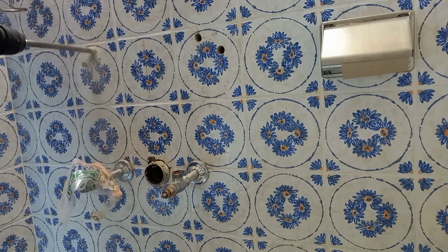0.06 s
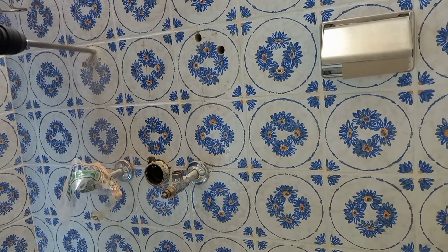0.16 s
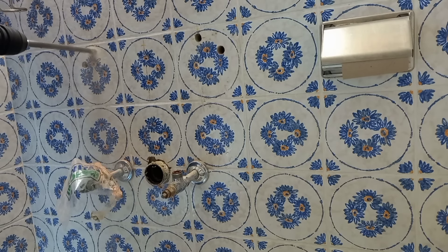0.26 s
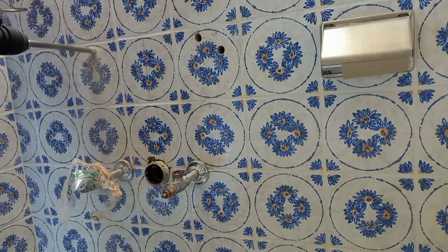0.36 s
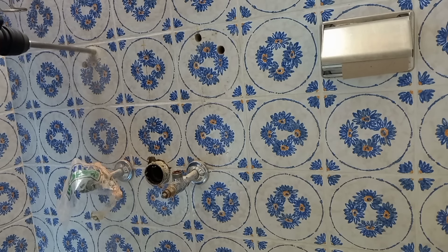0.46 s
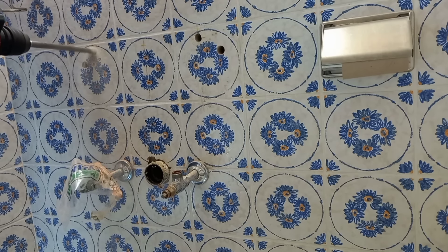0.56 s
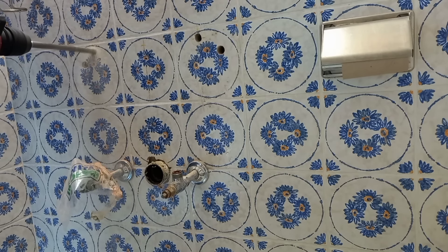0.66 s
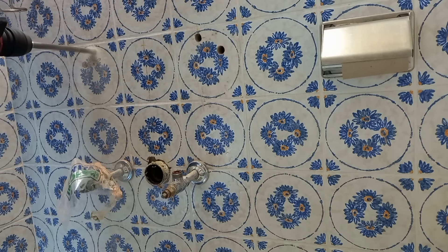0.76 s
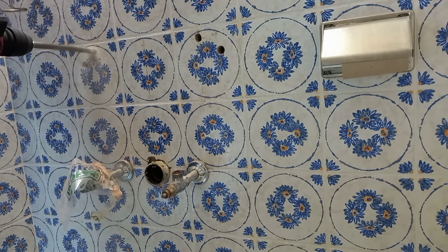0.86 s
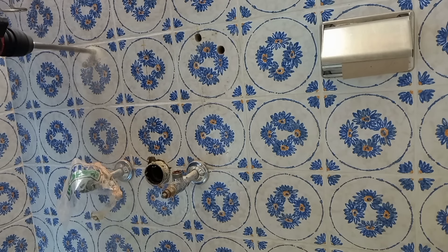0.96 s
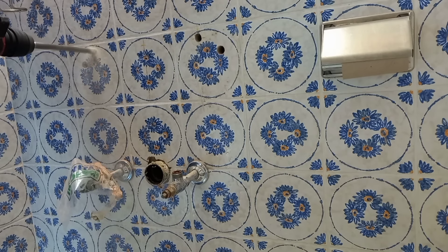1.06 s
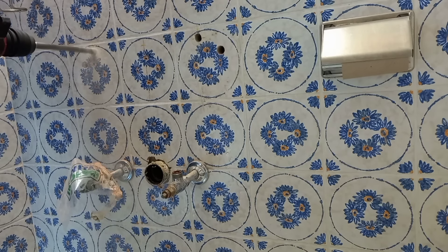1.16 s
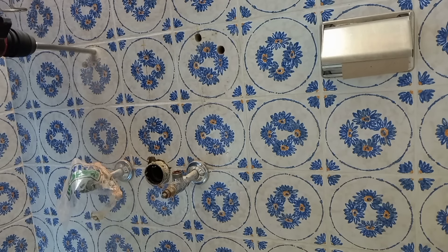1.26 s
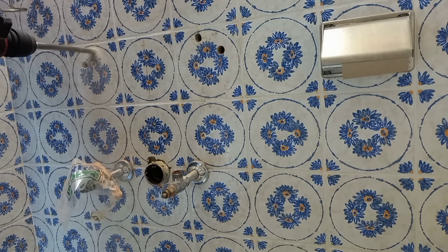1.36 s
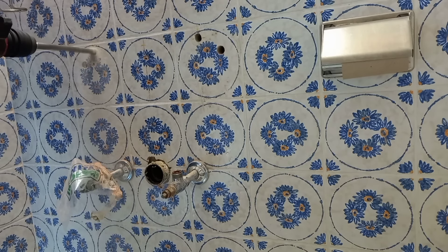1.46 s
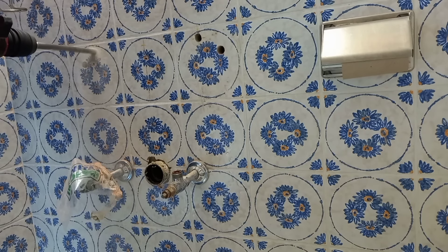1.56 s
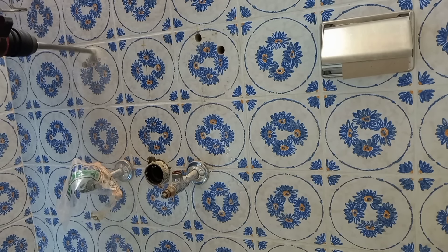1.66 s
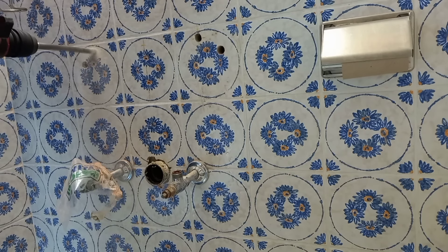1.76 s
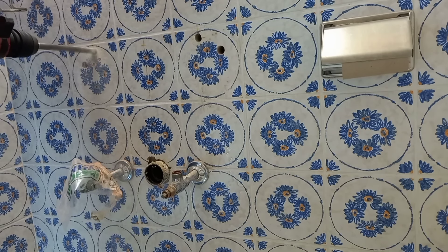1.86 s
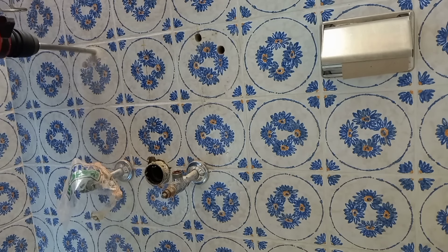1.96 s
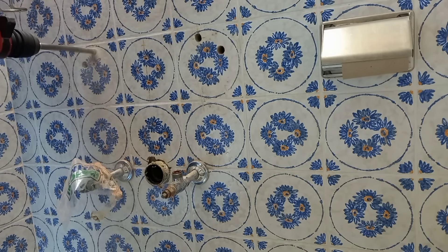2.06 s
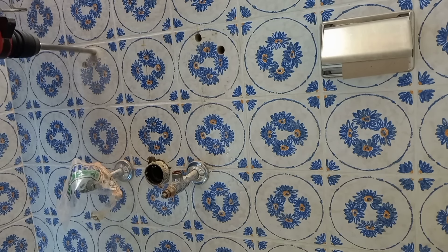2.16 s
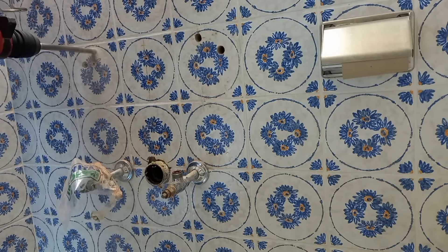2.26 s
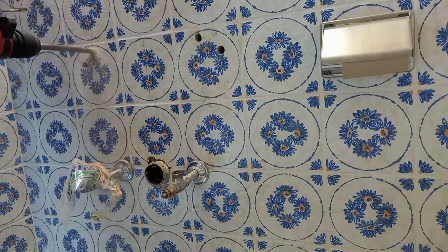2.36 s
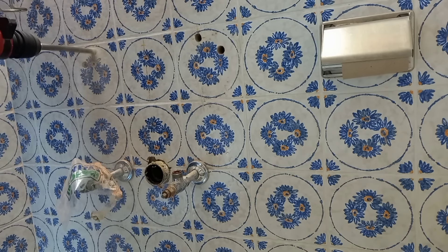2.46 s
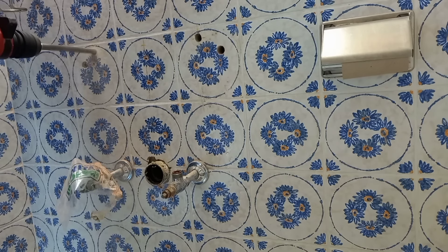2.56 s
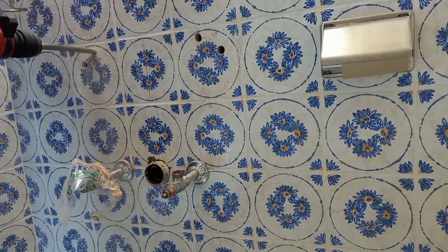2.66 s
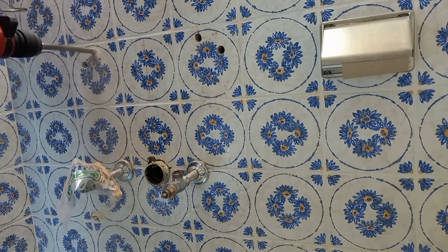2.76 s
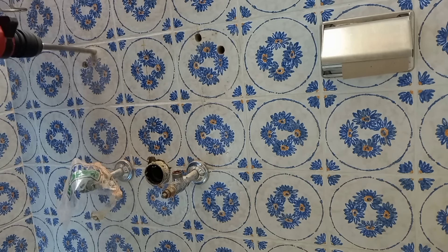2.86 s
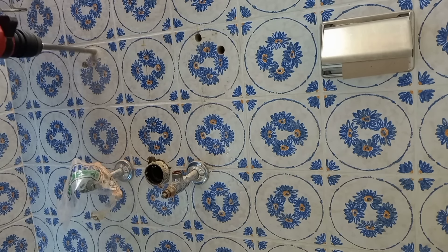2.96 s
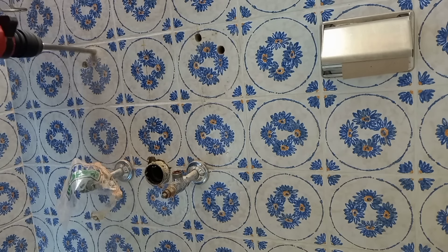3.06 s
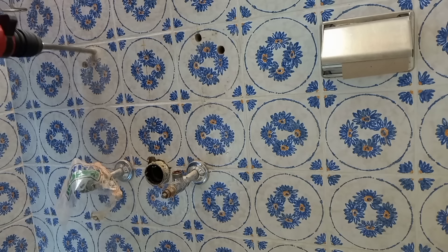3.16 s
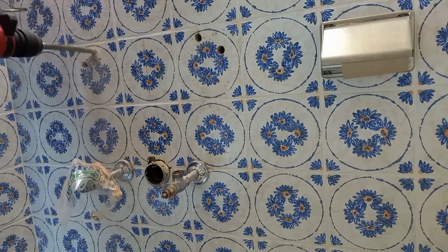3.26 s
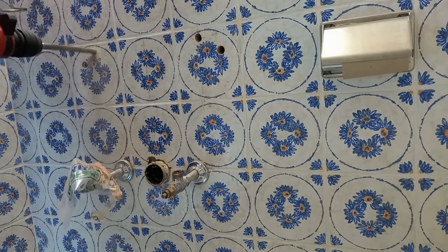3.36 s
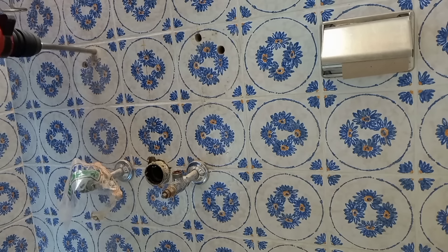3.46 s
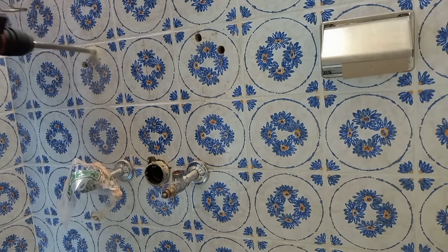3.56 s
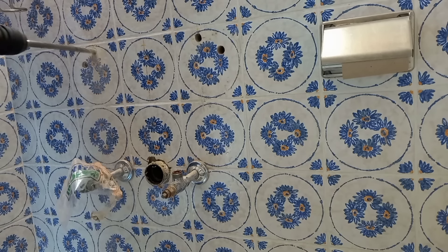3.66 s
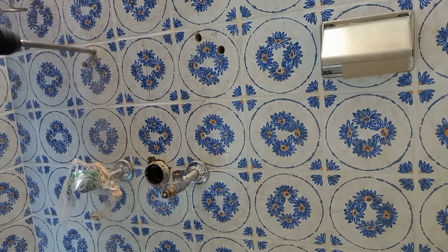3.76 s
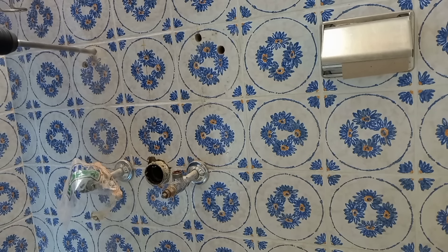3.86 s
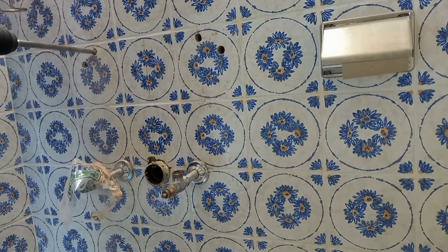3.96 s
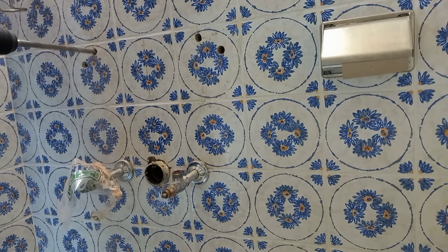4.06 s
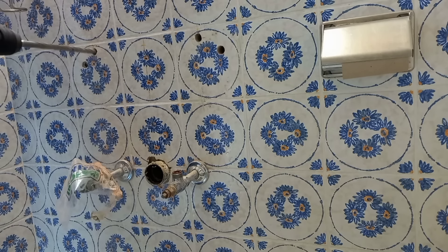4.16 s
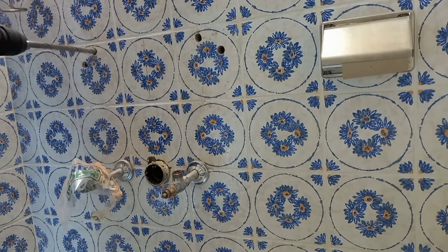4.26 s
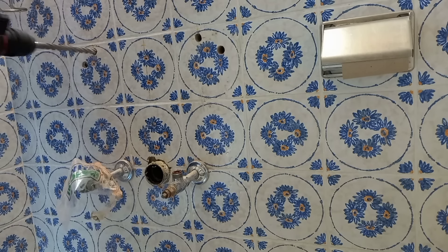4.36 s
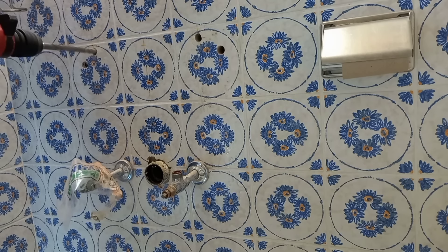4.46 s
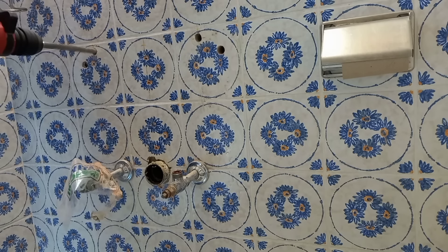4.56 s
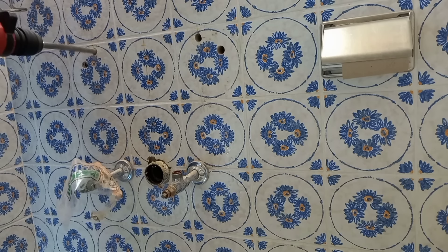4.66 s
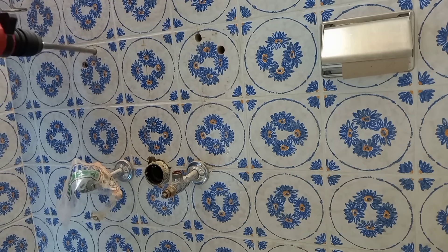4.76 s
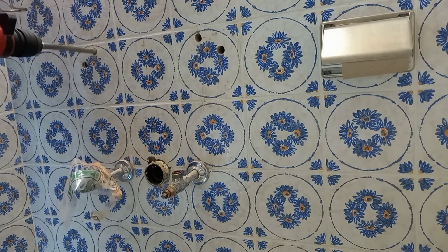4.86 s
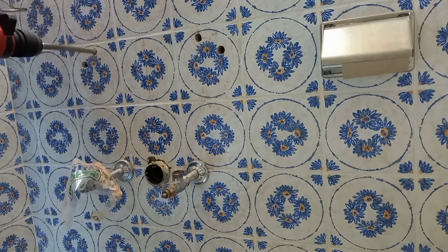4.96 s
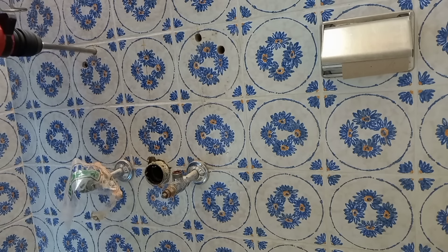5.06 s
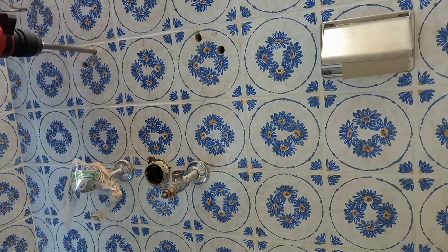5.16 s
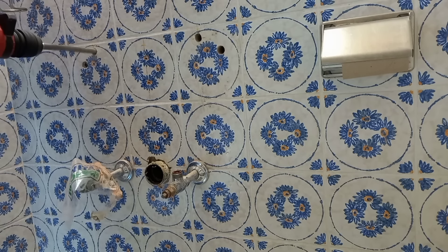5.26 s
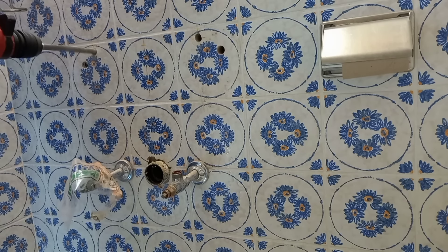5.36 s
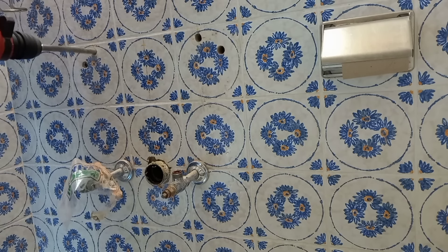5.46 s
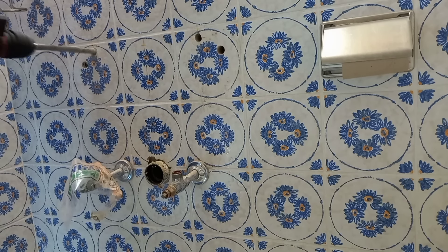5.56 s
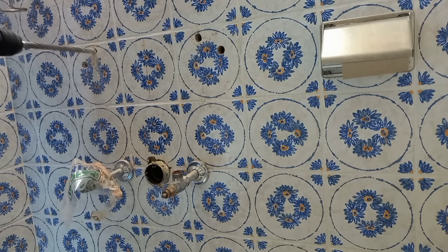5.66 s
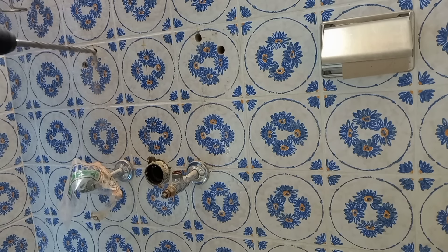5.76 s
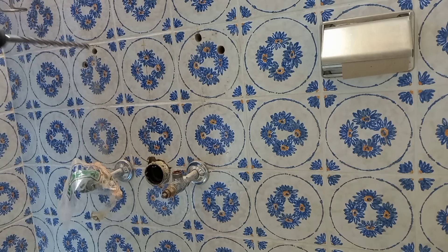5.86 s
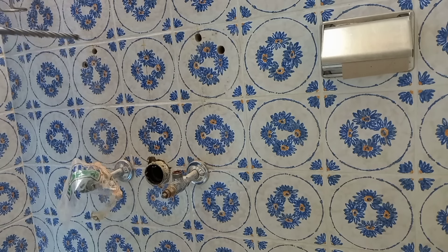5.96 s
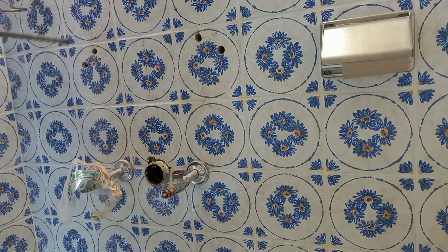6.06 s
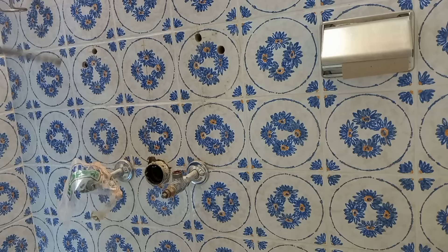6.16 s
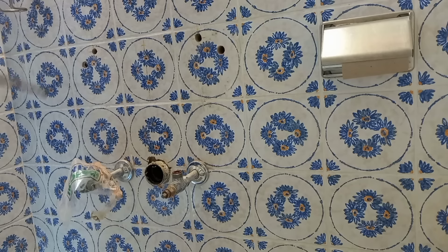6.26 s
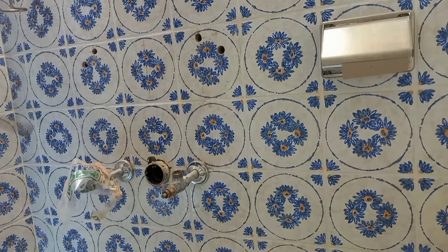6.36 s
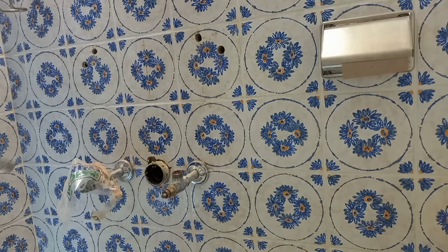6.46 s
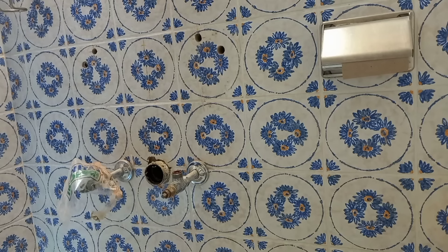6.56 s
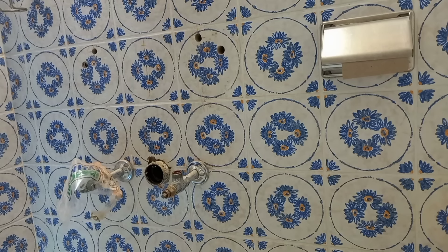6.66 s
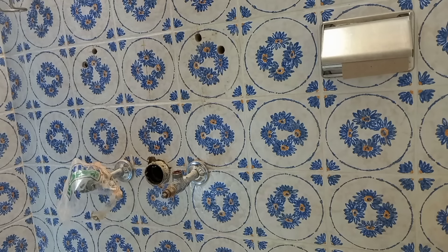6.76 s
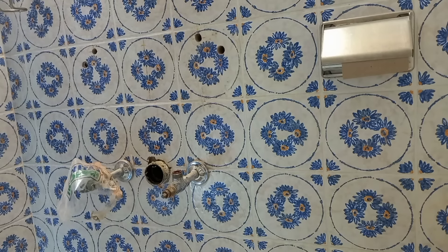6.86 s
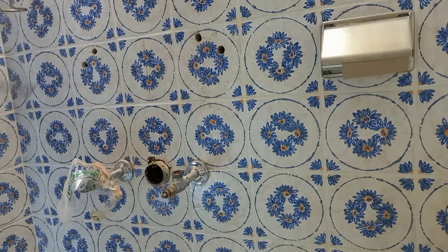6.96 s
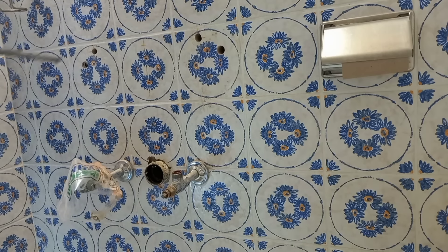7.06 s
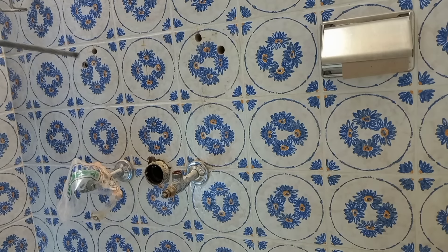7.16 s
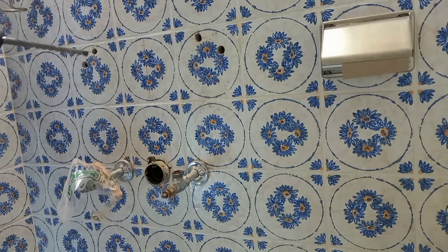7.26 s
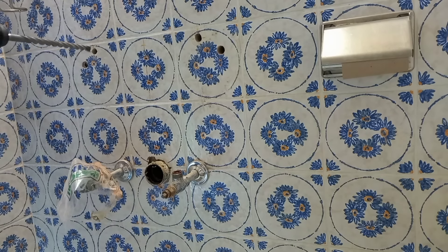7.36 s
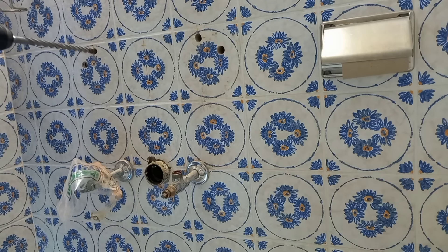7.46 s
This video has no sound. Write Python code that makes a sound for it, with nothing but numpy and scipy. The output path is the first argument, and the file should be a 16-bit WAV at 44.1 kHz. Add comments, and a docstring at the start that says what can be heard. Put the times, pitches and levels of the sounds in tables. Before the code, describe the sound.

A cordless hammer drill is already boring into a tiled bathroom wall, with rapid blows, gritty cracking, gear whine and rushing fan air. It coasts down, spins briefly free, then bites again with piercing squeals and jolts. It winds down to near silence, with plastic clicks and soft rubbing, before starting again at the end. Close phone pickup, slightly overloaded, with a hard short room tail.

```python
"""Heavy hammering and a gear whine burst out at once: a cordless hammer drill bores into a tiled bathroom wall.
It eases off and spins free, bites again and stops; the tool clicks in the hand and starts once more.
One motor speed drives whining gears, rushing fan air and the blows, which ring the wall and crack the tile.
Noise rings the steel bit as it squeals, and brief screeches cut through; the hard room adds a tail.
A low 120 Hz hum lies beneath, swelled by the room's ring as the drilling stops."""
import sys
import numpy as np
from scipy import signal
from scipy.fft import rfft, irfft, next_fast_len
from scipy.io import wavfile
from scipy.ndimage import uniform_filter1d

SR = 44100
rng = np.random.default_rng(int(sys.argv[2]) if len(sys.argv) > 2 else 0)


def dump_mix(stems):
    """Bounce the given channels to the path in sys.argv[1] as a 16-bit WAV at rate SR."""
    frames = np.atleast_2d(stems).T  # one column per channel
    limited = np.clip(frames, -1, 1)  # hard clip at full scale
    pcm = np.round(limited * 32767).astype(np.int16)
    wavfile.write(sys.argv[1], SR, pcm)


N = 331191
TIME = np.arange(N) / SR
FFT_SIZE = next_fast_len(N + SR // 2, True)
FREQ = np.fft.rfftfreq(FFT_SIZE, 1 / SR)

TOP_HZ = 15900  # top of the audible band
FULL_HZ = 2300  # tooth rate taken as full speed
TEETH_PER_BLOW = 72  # gear teeth that pass in one stroke of the striker
PUSH_RELEASE_S = 0.056

# pushes of the bit into the wall, relative levels:
# start_s, end_s, boom_db, thud_db, tile_crack_db, grinding_db
PUSHES = [(-.1, 0.289, -30, -24.5, -37.5, -26), (0.292, 1.517, -32.5, -26, -38.5, -34),
          (1.495, 3.397, -27, -25, -33.5, -30), (4.425, 4.561, -24.5, -25, -29, -32.5),
          (4.563, 5.412, -28.5, -27.5, -30.5, -40), (7.464, 7.998, -15.5, -21.5, -45, -50)]
# stereo width of the tiled room: pitch_hz, side_against_mid_db (before each source's own offset)
ROOM_WIDTH = [(80, -11.5), (250, -4), (700, -1), (1400, 2), (5000, 2.5), (9000, -5), (14000, -6.5)]
# resonances of the tool's shell: pitch_hz, width_hz, level_db (relative)
SHELL_MODES = [(575, 130, -7.5), (1023, 83, -4.5), (1173, 55, -5.5), (1343, 80, -4.5), (1730, 76, -1.5),
               (2440, 99, -10.5), (2850, 210, -11)]


def undb(db):
    """Decibels to gain."""
    return 10 ** (np.asarray(db) / 20)


def unit(x):
    """Scale to rms 1."""
    return x / np.sqrt(np.mean(x ** 2))


def noise():
    """White noise."""
    return rng.standard_normal(N)


def gains(table):
    """The dB columns of a curve over time as gains, silent outside its span."""
    s, *columns = np.transpose(table)
    return np.array([np.interp(TIME, s, undb(c), left=0, right=0) for c in columns])


def over_time(table):
    """Read (s, value) points along the scene."""
    return np.interp(TIME, *np.transpose(table))


def over_hz(table, hz):
    """Read (Hz, value) points on a log-frequency axis."""
    points, values = np.transpose(table)
    return np.interp(np.log(np.maximum(hz, 1)), np.log(points), values)


def shape(x, response):
    """Filter by a frequency response."""
    return irfft(rfft(x, FFT_SIZE) * response)[..., :N]


def colour(x, table):
    """Give x a spectrum of (Hz, dB) points, at rms 1."""
    return unit(shape(x, undb(over_hz(table, FREQ))))


def ring(x, modes):
    """Drive (Hz, width Hz, dB) resonances of alternating sign with x, at rms 1."""
    response = 0
    for k, (hz, width, db) in enumerate(modes):
        resonance = width * FREQ / (width * FREQ + 1j * (FREQ ** 2 - hz * hz))
        response = response + (-1) ** k * undb(db) * resonance
    return unit(shape(x, response))


def wander(rate):
    """Random drift at rms 1, heading in a straight line for a new value rate times a second."""
    return unit(np.interp(TIME * rate, np.arange(N // 8), rng.standard_normal(N // 8)))


def burst(s, rise, decay):
    """Envelope of one short contact: a straight rise, then a dying tail."""
    age = np.maximum(TIME - s, 0)
    return np.minimum(age / rise, 1) * np.exp(-np.maximum(age - rise, 0) / decay)


def hold(start, end, attack_s, release_s):
    """Envelope that swells, holds and dies away."""
    return np.clip((TIME - start) / attack_s, 0, 1) * np.exp(-np.maximum(TIME - end, 0) / release_s)


def contact(start, end, release_s):
    """Envelope of one push, which takes hold quickly."""
    return hold(start, end, 0.02, release_s)


def room(x, direct_db, side_db=0):
    """Direct sound and the dense tail of tiled walls, each band dying at its own pace, in stereo."""
    # decay of the room: pitch_hz, t60_s
    decay_table = [(300, 0.5), (1300, 0.5), (3500, 0.38), (9000, 0.01), (15000, 0.1)]
    t = TIME[:SR // 2]
    hz = np.fft.rfftfreq(len(t), 1 / SR)
    diffuse, tail = rfft(rng.standard_normal((2, len(t)))), 0
    for centre, t60 in decay_table:
        band = over_hz([(f, f == centre) for f, _ in decay_table], hz)  # crossfades into its neighbours
        tail = tail + irfft(diffuse * band) * np.exp(-np.log(1000) * t / t60) / np.sqrt(t60)
    mid, side = tail / np.sqrt(np.sum(tail[0] ** 2))
    mid[0] += undb(direct_db)
    mid, side = (signal.fftconvolve(x, h)[:N] for h in (mid, side))
    side = shape(side, undb(over_hz(ROOM_WIDTH, FREQ) + side_db))
    return np.array([mid + side, mid - side]) / np.hypot(1, undb(direct_db))


def motor_speed():
    """Tooth rate in Hz: each pull ramps the motor up to the speed it can hold; let go, it coasts down."""
    # pulls of the trigger: pressed_s, released_s, spin_up_hz_per_s, coast_time_constant_s
    pulls = [(-.5, 3.47, 7800, .33), (3.682, 3.808, 8000, .71), (4.452, 4.725, 7800, .28),
             (4.85, 5.384, 9000, .272), (7.443, 8, 8000, .3)]
    # speed that the motor holds against the wall: time_s, tooth_rate_hz
    held_speed = [(0, 2217), (.08, 2136), (.24, 2217), (.32, 2158), (.46, 2356), (.62, 2288), (.68, 2351),
                  (.88, 2292), (1.02, 2304), (1.17, 2127), (1.27, 2318), (1.37, 2416), (1.45, 2429),
                  (1.6, 2288), (2, 2116), (2.19, 2280), (2.56, 2289), (2.68, 2154), (2.85, 2253),
                  (3.05, 2288), (3.22, 2230), (3.43, 2344), (4.73, 2324), (5.02, 2374), (5.38, 2363)]
    held, hz = over_time(held_speed), np.zeros(N)
    for pressed, released, spin_up, coast in pulls:
        ramp = np.interp(pressed, TIME, hz) + spin_up * (TIME - pressed)
        hz = np.where(TIME < pressed, hz, np.minimum(ramp, held))
        coasting = np.interp(released, TIME, hz) * np.exp(-np.maximum(TIME - released, 0) / coast)
        hz = np.where(TIME < released, hz, coasting)
    return hz


def running(tooth_hz, stall_steepness=6):
    """Gain of the running noises: near 1 at full speed, dying away below the stall, silent at rest."""
    stall_hz, speed_power = 518, 0.65
    turning = (tooth_hz / stall_hz) ** stall_steepness
    return (tooth_hz / FULL_HZ) ** speed_power * turning / (1 + turning)


def drag(tooth_hz, smooth_s=0.039):
    """How hard the bit brakes the motor, 0 to 1: a free bit lets it coast, a bit in the hole slows it fast."""
    slowing = uniform_filter1d(-np.gradient(np.log(tooth_hz + 1)) * SR, int(smooth_s * SR))
    return np.interp(slowing, [2.3, 2.9], [0, 1])  # share of the speed lost per second


def background():
    """A low hum and a thin steady tone over the faint hiss of the room."""
    # low 120 Hz hum, swelled by the room's ring as the drilling stops: time_s, level_db (relative)
    hum_level = [(0, -62), (3.5, -33.5), (3.8, -44), (5.6, -48.5), (5.95, -60.5), (6.7, -61), (7.5, -60.5)]
    # spectrum of the quiet room: pitch_hz, level_db (relative)
    quiet_colour = [(24, -37), (45, -9), (75, 0.5), (130, -6), (190, -16.5), (350, -20), (730, -32.5),
                    (3000, -35), (5800, -32.5), (9100, -21), (15800, -29)]
    hum = undb(2.5) * gains(hum_level)[0] * np.sin(2 * np.pi * 120 * TIME) * undb(.7 * wander(16))
    tone = undb(-72) * np.sin(2 * np.pi * 414.5 * TIME)
    hiss = undb(-62) * colour(noise(), quiet_colour)
    return hum + tone + room(hiss, direct_db=-4)


def handling():
    """Plastic clicks among light knocks, soft rubbing and rumble, before the tool starts again."""
    # clicks and short scrapes in the hand, the last one the bit touching the tile:
    # start_s, level_db (relative), rise_s, decay_s, tilt_db_per_octave
    click_events = [(6.203, -34.5, 0.0017, 0.019, 0), (6.218, -31.5, .014, 0.041, 0),
                    (6.298, -31.5, 0.00099, 0.035, 2), (6.2988, -25, .0003, 0.00049, 0),
                    (6.396, -37.5, .008, 0.031, -1.5), (6.476, -45, 0.013, 0.025, -1),
                    (6.509, -35, 0.027, 0.012, -1), (7.486, -40, 0.0077, .02, 1.5)]
    # light knocks on the shell, as the gears settle and the grip changes: start_s, level_db (relative), decay_s
    knock_events = [(5.85, -55, 0.013), (5.921, -67, 0.012), (5.97, -62.5, 0.012), (6.305, -48.5, 0.023),
                    (6.522, -59, 0.017), (6.811, -54.5, 0.015), (6.845, -60, 0.024)]
    # the hand shifts on the tool, relative levels: start_s, rubbing_db, rumble_db, rise_s, decay_s
    shifts = [(5.99, -56, -75, 0.036, 0.031), (6.1, -57.5, -74, 0.049, 0.013),
              (6.785, -57, -68, 0.026, .04), (6.84, -59, -53, 0.028, 0.071),
              (7.02, -59.5, -76, 0.096, 0.063), (7.17, -61, -80.5, 0.028, 0.044)]
    # spectra of clicks and of rubbing: pitch_hz, level_db (relative)
    click_colour = [(290, -52), (500, -13), (545, -20), (794, -27), (958, -12), (1320, -12.5), (2200, -2),
                    (3500, -0.5), (5510, -6), (9010, 0.5), (13300, -7), (15800, -8.5)]
    rub_colour = [(150, -25), (400, -2), (800, -23), (1700, -5.5), (3000, -2.5), (6000, -3), (9300, -2),
                  (15800, -2.5)]
    grit, clicks = noise() * undb(2.2 * wander(1800)), 0
    for s, db, rise, decay, tilt in click_events:
        tilted = [(hz, level + tilt * np.log2(hz)) for hz, level in click_colour]
        clicks = clicks + undb(db - 3) * burst(s, rise, decay) * colour(grit, tilted)
    taps = sum(undb(db) * burst(s, 0.0037, decay) for s, db, decay in knock_events)
    knocks = taps * ring(noise(), SHELL_MODES)
    rub, rumble = sum(np.outer(undb(levels), burst(s, rise, decay)) for s, *levels, rise, decay in shifts)
    rubbing = undb(3.5) * rub * colour(noise() * undb(2 * wander(270)), rub_colour)
    low_rumble = undb(-3.5) * rumble * ring(noise(), [(74, 16, 0)])
    return room(clicks + knocks + rubbing, direct_db=2.5) + low_rumble


def fan(tooth_hz, throb=0.083):
    """Cooling air and brush hiss, throbbing with the turning gears."""
    # spectrum of the air: pitch_hz, level_db (relative)
    air_colour = [(50, -0.5), (75, -4), (130, -12.5), (220, -7.5), (300, -7), (600, -16.5), (800, -17.5),
                  (1600, -12.5), (2700, -2.5), (3200, -5.5), (4200, 1.5), (5800, -6.5), (8000, -.5),
                  (9000, 0), (9900, -5), (11200, -3.5), (15800, -21)]
    turn = 2 * np.pi * np.cumsum(tooth_hz) / SR / TEETH_PER_BLOW
    air = colour(noise() * (1 + throb * np.sin(turn)) * undb(2.3 * wander(240)), air_colour)
    level = undb(-26.5 - 0.5 * drag(tooth_hz))  # a dragging bit muffles it
    return room(level * running(tooth_hz) * air, direct_db=1, side_db=1.5)


def chatter(tooth_hz, level_db=-43, fade_power=0.97):
    """Slack gears chatter: fluttering noise rings the shell while the motor turns."""
    slack = running(tooth_hz, stall_steepness=12) ** fade_power
    rattle = ring(noise() * undb(2.5 * wander(120)), SHELL_MODES)
    return room(undb(level_db) * slack * rattle, direct_db=-2)


def screech(rise_s=0.0063, decay_s=.014):
    """Brief screeches near 3 kHz, from the bit or the motor sweeping past its case, each with its octave."""
    # screeches: start_s, pitch_hz, level_db (relative)
    screeches = [(.04, 3674, -21), (0.086, 2414, -28), (.15, 3388, -18.5), (.215, 2608, -23.5),
                 (.243, 3681, -19), (2.403, 2950, -17), (2.433, 2600, -24), (2.59, 2650, -20),
                 (2.689, 2556, -18.5), (4.862, 2808, -24.5), (4.884, 2790, -21.5)]
    source, cries = noise(), 0
    for s, hz, db in screeches:
        cry = ring(source, [(hz, 260, 0), (2 * hz, 400, -10)])
        cries = cries + undb(db) * burst(s, rise_s, decay_s) * cry
    return room(cries, direct_db=3)


def squeal(rise_s=0.005, decay_s=0.011):
    """The bit binds in the hole on some blows and rings high."""
    # squeals of the bit: start_s, level_db (relative)
    squeals = [(4.587, -16.5), (4.619, -17), (4.651, -13.5), (4.683, -23.5), (4.714, -14), (4.781, -15),
               (4.872, -24), (4.903, -32.5), (4.937, -25.5), (5.357, -17)]
    # resonances of the steel bit: pitch_hz, width_hz, level_db (relative)
    bit_modes = [(8120, 90, -16.5), (9200, 100, -15), (10940, 46, 7)]
    grip = sum(undb(db) * burst(s, rise_s, decay_s) for s, db in squeals)
    return room(undb(2.5) * grip * ring(noise(), bit_modes), direct_db=8.5)


def whine(tooth_hz, flutter=0.00702, rasp=.013, free_shiver=.5, patchy_db=2.0):
    """Meshing gear teeth shiver more under load, each partial in a band of rasp; the motor adds its own tones."""
    # partials of the gear mesh, from the first upward, relative: running_free_db, under_load_db
    mesh = [(-4.5, -0.5), (-10, 1.5), (2, 0.5), (0, -3.5), (-2, -4), (-2, -11), (-2, -13), (-4.5, -9.5),
            (-8, -12.5), (-8, -16.5)]
    # partials of the motor: multiple_of_its_tone, level_db (relative)
    motor_partials = [(0.876, -15), (1, -1), (2, -11), (3, -7), (4, -6), (5, -2.5), (6, -5)]
    # the loaded whine comes and goes, relative: time_s, first_partial_db, upper_partials_db
    whine_level = [(0, 3, 10), (.08, 6, 0), (.3, 6, 4.5), (.46, 8, 1.5), (.72, 3.5, 2.5), (.95, 2, 1.5),
                   (1.17, 5, 5), (1.42, -12, -1.5), (1.6, 5, 5.5), (2, -1, 3), (2.2, 5, 3), (2.55, 3.5, 5),
                   (2.76, 1, 2), (2.85, -0.5, 2.5), (3.05, -2.5, -3), (3.22, -4, -6), (3.42, -2.5, -8.5),
                   (4.6, -1, 5), (4.7, 9, -3), (4.96, 5.5, 1), (5.2, 3, 1.5), (5.38, -1.5, -1)]
    # how the gear case radiates the partials: pitch_hz, level_db (relative)
    housing = [(700, -19), (1200, -8), (1700, 1.5), (2300, -3.5), (3300, -5), (4900, -3), (5800, -12.5),
               (7000, -8), (9200, 0), (11500, -2.5), (14000, -24.5)]
    # rough teeth spread each partial into a rasp that glides with it: pitch_hz, level_db (relative)
    gear_rasp = [(2000, -48), (4500, -39.5), (5800, -48), (7000, -43.5), (9000, -35), (11300, -37.5),
                 (14000, -46)]
    free_base_db, loaded_base_db, motor_base_db = -31, -29.5, -41
    free_power, loaded_power, rasp_power = 0.36, 7.7, 0.61  # the loaded whine drops steeply as speed sags
    motor_order = 1.77  # motor tone as a multiple of the tooth rate
    case_hz, case_width_hz, case_boost_db, case_ring_s = 2720, 510, 14, 0.03

    load = np.max([contact(start, end, PUSH_RELEASE_S) for start, end, *_ in PUSHES], axis=0)
    shiver = (flutter * wander(70) + rasp * wander(900)) * np.maximum(load, free_shiver)
    phase = 2 * np.pi * np.cumsum(tooth_hz * (1 + shiver)) / SR
    speed, tones = tooth_hz / FULL_HZ, 0
    up_to_speed = np.minimum(speed, 1) ** loaded_power
    free = undb(free_base_db) * speed ** free_power * (1 - load * up_to_speed)
    first, upper = undb(loaded_base_db) * gains(whine_level) * load * speed ** loaded_power
    roughness = speed ** rasp_power
    for k, (free_db, loaded_db) in enumerate(mesh, 1):
        hz = k * tooth_hz
        loaded = first if k == 1 else upper
        radiated = undb(over_hz(housing, hz) + patchy_db * wander(35))
        clean = radiated * (undb(free_db) * free + undb(loaded_db) * loaded)
        rough = undb(over_hz(gear_rasp, hz)) * roughness * wander(200 * k)
        tones = tones + (clean + rough) * (hz < TOP_HZ) * np.sin(k * phase)
    for multiple, db in motor_partials:
        order = multiple * motor_order
        hz = order * tooth_hz
        in_tune = 1 / (1 + ((hz - case_hz) / case_width_hz) ** 2)
        # the case needs time to ring up, so a quick sweep rings it less
        case_db = case_boost_db * uniform_filter1d(in_tune, int(case_ring_s * SR))
        level = undb(motor_base_db + db + case_db + patchy_db * wander(35))
        tones = tones + level * (hz < TOP_HZ) * np.sin(order * phase)
    muffling = undb(-4.5 * drag(tooth_hz))  # the bit drags in the hole
    return room(muffling * running(tooth_hz) * tones, direct_db=0.5, side_db=2.5)


def drones(swell_s=0.024, release_s=0.038, waver_db=2.5, drift_hz=1.55, pan_db=-1.5):
    """Steady blows pump one resonance of wall or room until it stands out; it wavers and dies away."""
    # drones under the blows: start_s, end_s, pitch_hz (it drifts about this), level_db (relative)
    drone_events = [(0.028, 0.106, 95, -28), (0.082, 0.148, 278.7, -26), (0.205, 0.465, 375, -27.5),
                    (0.778, 0.84, 238, -24), (1.44, 1.548, 240.4, -18), (1.517, 1.808, 129.7, -25),
                    (1.57, 1.59, 377, -18), (1.68, 2.08, 90.9, -27.5), (1.849, 2.135, 215.6, -24.5),
                    (2.026, 2.146, 242.7, -22), (2.3, 2.36, 376.1, -27.5), (2.605, 2.676, 237.2, -25.5),
                    (2.676, 3, 91.3, -25), (3.001, 3.119, 215.2, -19.5), (2.72, 2.982, 119.8, -30),
                    (3.112, 3.42, 119.7, -22.5), (4.68, 4.746, 162.8, -22.5), (4.819, 4.904, 73.9, -22.5)]
    waver, drift, out = undb(waver_db * wander(25)), drift_hz * wander(20), 0
    for start, end, hz, db in drone_events:
        cycles = np.cumsum(hz + drift) / SR + rng.random()
        out = out + undb(db) * hold(start, end, swell_s, release_s) * np.sin(2 * np.pi * cycles)
    return np.outer(undb([pan_db / 2, -pan_db / 2]), waver * out)


def force(tooth_hz, speed_power=0.85, grind_share=0.91):
    """Gains of boom, thud, crack and grinding: they grow with speed and lean, and rattle between pushes."""
    # how hard the hand leans on the tool: time_s, level_db (relative)
    lean = [(0, 3.5), (.28, -0.5), (.44, -3.5), (.56, -2), (.75, -3), (.82, 1), (1.08, 3), (1.3, -1.5),
            (1.5, 0.5), (1.9, 3.5), (2.15, 0.5), (2.35, 3), (2.52, -1.5), (2.62, 1.5), (3.35, -0.5),
            (4.45, -5), (4.6, 2), (4.76, -1.5), (4.95, -1), (5.01, -1.5), (5.1, -1), (5.4, -2)]
    # deep boom against the rest of a push: time_s, level_db (relative)
    boom_level = [(0, 3), (.3, 3), (1.2, 2.5), (1.42, -8.5), (1.62, -1), (1.9, -1.5), (2.32, -2), (2.85, 3),
                  (3.07, -3.5), (3.3, 4.5), (3.45, -2), (4.6, -4.5), (4.86, 3.5), (5.02, 1.5), (5.2, 3.5)]
    # the striker rattling with no push, relative: boom_db, thud_db, tile_crack_db, grinding_db
    idle_db = (-63, -56, -49.5, -57.5)
    lean_db = np.outer([1, 1, 1, grind_share], over_time(lean))
    strength = undb(lean_db) * (tooth_hz / FULL_HZ) ** speed_power
    releases = [0.28, PUSH_RELEASE_S, PUSH_RELEASE_S, PUSH_RELEASE_S]  # the boom outlasts the rest
    pushes = []
    for start, end, *levels in PUSHES:
        pushes.append([undb(db) * contact(start, end, release) for db, release in zip(levels, releases)])
    pushed = np.max(pushes, axis=0)
    pushed[0] *= undb(over_time(boom_level))
    return np.maximum(strength * pushed, np.outer(undb(idle_db), running(tooth_hz)))


def blows(tooth_hz, rebound_db=-2, scatter_db=2.0, jitter_s=.0012):
    """The striker hits once a stroke and rebounds half a stroke later, never quite evenly."""
    # hard jolts, as the bit lands on the wall or breaks off a chip: start_s, level_db (against a normal blow)
    jolts = [(4.431, 8.5), (4.441, 6), (4.464, 0.5), (4.526, 2), (4.581, 1.5), (4.665, 2.5), (4.729, 3),
             (4.757, 5.5), (4.804, 6.5), (4.838, 4.5), (4.988, 5.5), (5.013, 4.5), (5.04, 4), (5.113, 4),
             (5.28, 2), (5.34, -1), (7.483, -0.5)]
    strokes = np.cumsum(tooth_hz) / SR / TEETH_PER_BLOW
    k = np.arange(int(2 * strokes[-1]))  # odd ones are rebounds
    chance = rng.standard_normal((N // 256, 2))[k]
    at = np.interp(k / 2, strokes, TIME) + jitter_s * chance[:, 0]
    size = undb(rebound_db * (k % 2) + scatter_db * chance[:, 1])
    jolt_s, jolt_db = np.transpose(jolts)
    at, size = np.append(at, jolt_s), np.append(size, undb(jolt_db))
    return np.bincount(np.clip(at * SR, 0, N - 1).astype(int), size, N)


def crumble(hits, decay_s, grain_db):
    """Each blow sets off a dying shower of uneven grains."""
    envelope = signal.lfilter([1], [1, -np.exp(-1 / (decay_s * SR))], hits)
    return unit(envelope * noise() * undb(grain_db * wander(1200)))


def resound(hits, modes, clean_db, decay_s, pan_db):
    """Blows and the rattle after them ring a set of resonances; the rattle differs between the ears."""
    mid = ring(undb(clean_db) * unit(hits) + crumble(hits, decay_s, grain_db=1), modes)
    side = ring(crumble(hits, decay_s, grain_db=1), modes)
    side = shape(side, undb(over_hz(ROOM_WIDTH, FREQ) - 6.5))
    return np.array([undb(pan_db / 2) * mid + side, undb(-pan_db / 2) * mid - side])


def hammer(tooth_hz):
    """Blows boom in the room, thud in the wall and crack the tile; the flutes grind the chips in between."""
    # deep resonances of the room, then those of the wall: pitch_hz, width_hz, level_db (relative)
    boom_modes = [(67.6, 5.7, -1), (74.1, 7, 5), (92, 3.9, 4), (117, 9.1, -2.5), (135.5, 7.3, -2),
                  (158.7, 10, -4.5)]
    wall_modes = [(215.2, 10, 1), (238, 11.8, 0), (266.4, 12, -3.5), (285.4, 8.2, -2), (316.6, 9.5, -2),
                  (368.6, 17.7, -1), (408, 24, -7.5), (443.7, 14, -5), (521.5, 22, -13), (571.5, 25, -10.5),
                  (623.5, 25, -13.5), (677, 45, -19), (826.5, 11, -9.5), (988, 47, -24)]
    # spectra of cracking tile and of ground chips: pitch_hz, level_db (relative)
    crack_colour = [(350, -2.5), (600, 7.5), (750, 1.5), (900, 2.5), (1400, -1.5), (2300, -2.5),
                    (3200, -6.5), (4500, -1.5), (5800, -10), (9000, -7.5), (11500, -6.5), (15000, -16)]
    grind_colour = [(1200, -27.5), (2400, 4.5), (3000, -4), (3800, 1.5), (4700, -4.5), (5800, -12.5),
                    (12000, -17)]
    boom, thud, crack, grind = force(tooth_hz)
    hits = blows(tooth_hz)
    deep = boom * resound(hits, boom_modes, clean_db=3.5, decay_s=0.024, pan_db=-1.5)
    wall = undb(1.02) * thud * resound(hits, wall_modes, clean_db=3, decay_s=0.013, pan_db=-1.3)
    masonry = shape(deep + wall, 1 / (1 + (FREQ / 900) ** 4))  # the heavy wall passes no treble
    tile = undb(4.5) * crack * colour(crumble(hits, decay_s=0.0083, grain_db=4), crack_colour)
    chips = grind * colour(crumble(hits, decay_s=0.013, grain_db=4), grind_colour)
    chips = undb(-1.5 + 4.1 * wander(60)) * chips
    return masonry + room(tile + chips, direct_db=-4)


def scene():
    """One motor speed drives the gears, the hammer and the fan."""
    tooth_hz = motor_speed()
    surroundings = background() + handling()
    tool = fan(tooth_hz) + chatter(tooth_hz) + whine(tooth_hz)
    cries = screech() + squeal()
    return surroundings + tool + cries + drones() + hammer(tooth_hz)


def record(dry):
    """The phone drops the deep bass, rounds the highest peaks and cuts the top."""
    thin = signal.sosfilt(signal.butter(8, 57, "high", fs=SR, output="sos"), dry)
    rounded = np.tanh(1.058 * thin) / 1.178
    return signal.sosfilt(signal.ellip(10, .2, 80, TOP_HZ, fs=SR, output="sos"), rounded)


dry = scene()
out = record(dry)
dump_mix(out)
```